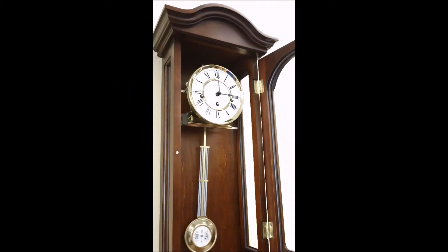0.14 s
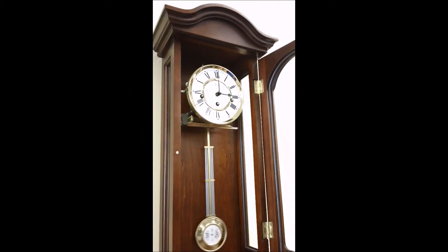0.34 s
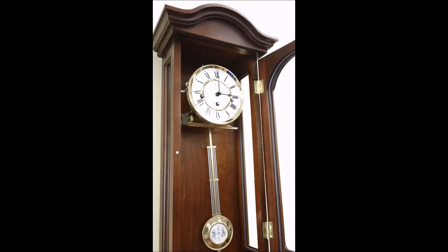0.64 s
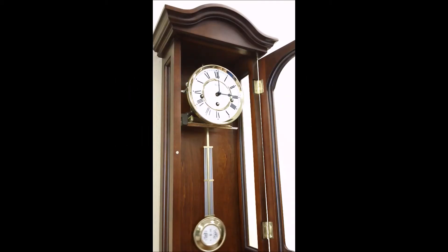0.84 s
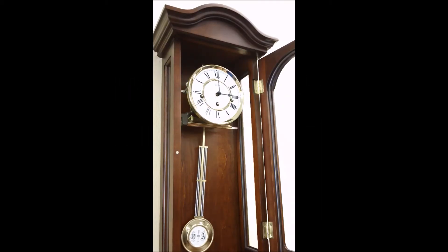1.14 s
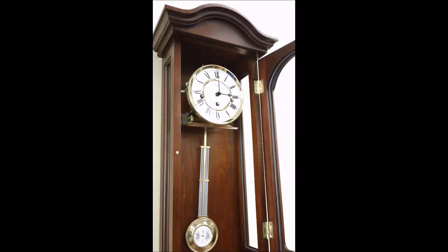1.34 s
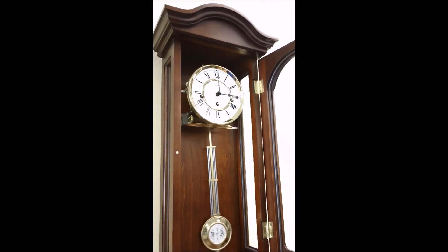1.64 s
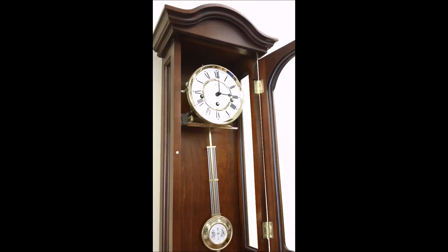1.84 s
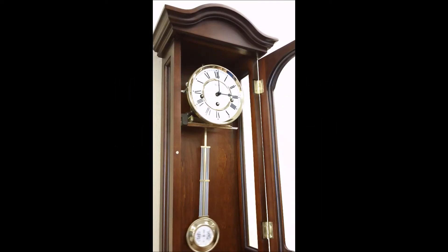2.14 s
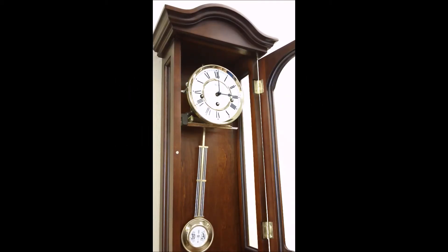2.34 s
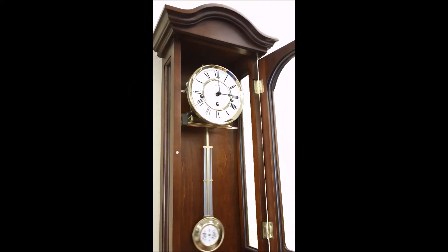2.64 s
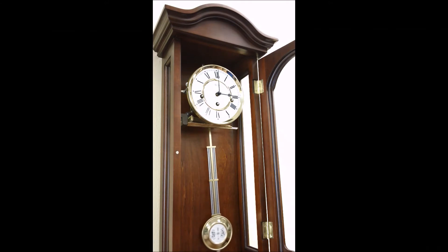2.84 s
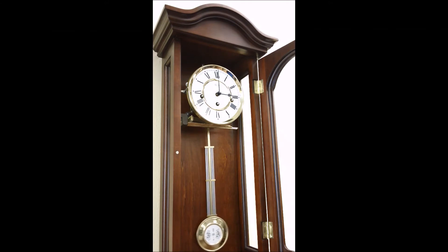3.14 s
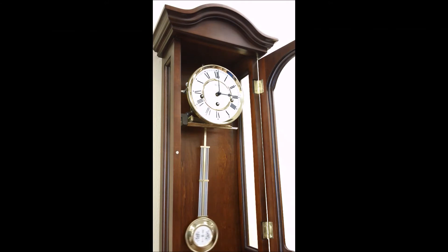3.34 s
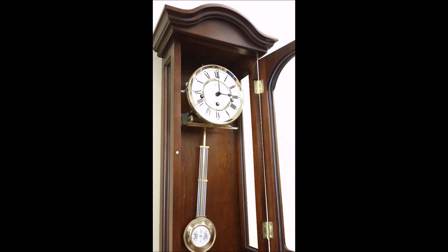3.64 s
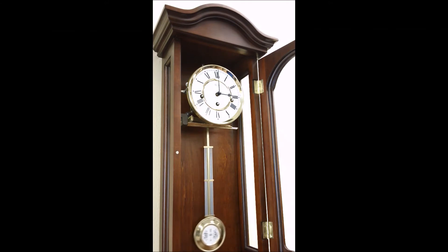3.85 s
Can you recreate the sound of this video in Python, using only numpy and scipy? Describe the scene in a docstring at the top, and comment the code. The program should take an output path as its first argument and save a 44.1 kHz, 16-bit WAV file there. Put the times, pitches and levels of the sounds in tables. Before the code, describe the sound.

Slow pendulum clock ticking, growing gradually louder, with one sharp metallic, woody clunk near the end

```python
"""Pendulum clock with a dropping lever

A wall clock ticks faintly in a quiet room: damped case partials and noise clicks, with tiny wheel clicks between.
Once a lever drops in the movement: ringing modes for plate, back board and lever, noise for rattle and panels.
Rumble, air, hum and hiss lie underneath, made of coloured noise and wavering sines, with one soft bump.
The whole sound grows slowly louder, and a decaying noise tail puts the clock in its room."""
import sys
import numpy as np
from scipy import signal
from scipy.fft import rfft, irfft, next_fast_len
from scipy.io import wavfile
from scipy.ndimage import map_coordinates

SR = 44100
rng = np.random.default_rng(int(sys.argv[2]) if len(sys.argv) > 2 else 0)


def wrap_up_sound(samples):
    """Save the sound to the file named by the first command line argument, as 16-bit audio."""
    columns = np.atleast_2d(samples).T
    # keep every value between -1 and 1, then stretch to whole-number steps
    tamed = np.clip(columns, -1, 1)
    steps = np.round(tamed * 32767).astype(np.int16)
    wavfile.write(sys.argv[1], SR, steps)


N = 176400  # samples, four seconds

# Partials of the wooden case. Each row: multiple of the case pitch, relative level in dB, T60 in seconds for a beat.
CASE_PARTIALS = [(0.999, 5, 0.041), (1.12, -6.5, .04), (1.62, -2.5, .04), (2.1, -9, 0.034),
                 (2.85, -5.5, 0.032)]
# Slow rise of the room noise. Each row: time in seconds, rumble level in dB, air level in dB, both before trim.
ROOM_NOISE_LEVELS = [(0.0, -62, -67.5), (0.43, -58.5, -65.5), (0.6, -59, -63), (0.87, -56, -62),
                     (1.53, -54.5, -60.5), (2.8, -50, -56.5), (3.04, -50.5, -56.5), (3.9, -49, -53),
                     (4.0, -49.5, -50)]


def amp(db):
    """Decibels to gain."""
    return 10 ** (np.asarray(db) / 20)


def unit(x):
    """Scale to rms 1."""
    return x / np.sqrt(np.mean(x ** 2) + 1e-20)


def along(points, hz):
    """Read (Hz, value) points on a log frequency axis."""
    point_hz, values = np.transpose(points)
    return np.interp(np.log(hz + 1), np.log(point_hz + 1), values)


def curves(rows):
    """One value per sample for each column after the time."""
    times, *columns = np.transpose(rows)
    return [np.interp(np.arange(N) / SR, times, column) for column in columns]


def wobble(rate):
    """A smooth random curve with rate knots a second."""
    knots = rng.standard_normal(int(N * rate / SR) + 4)
    return map_coordinates(knots, [np.arange(N) * rate / SR])


def filtered(x, response):
    """Multiply the spectrum of x by a response of frequency, with zero padding."""
    size = next_fast_len(N + SR // 2)
    spectrum = rfft(x, size) * response(np.fft.rfftfreq(size, 1 / SR))
    return irfft(spectrum, size)[..., :N]


def noise(spectrum):
    """Noise of rms 1 coloured by (Hz, dB) points."""
    return unit(filtered(rng.standard_normal(N), lambda hz: amp(along(spectrum, hz))))


def stereo(mid, side):
    """Left and right from middle and side."""
    return np.array([mid + side, mid - side])


def wide(spectrum, width):
    """Coloured noise in stereo; width is the level of the side over the middle."""
    return stereo(noise(spectrum), width * noise(spectrum))


def fade(rise, t60):
    """Half a second of exponential attack and decay, cut at its end."""
    t = np.arange(SR // 2) / SR
    decay = 1000 ** (-t / t60)  # 60 dB down after t60
    return (1 - np.exp(-t / rise)) * decay


def ring(modes, rise):
    """Struck resonances: a sum of damped sines from (Hz, dB, T60) rows."""
    t = np.arange(SR // 2) / SR
    return sum(amp(db) * fade(rise, t60) * np.sin(2 * np.pi * hz * t) for hz, db, t60 in modes)


def at(start_s, x):
    """Place a short sound in the scene."""
    return np.pad(x, (round(start_s * SR), N))[:N]


def rumble_and_air():
    """Low rumble, nearly mono, and wider air: two coloured noises that grow louder."""
    # Tone of the rumble. Each row: frequency in Hz, relative level in dB.
    rumble_colour = [(20, -17), (40, -15.5), (70, -6.5), (110, 4), (170, -4.5), (330, -2.5), (450, -14),
                     (700, -23.5), (1500, -64)]
    # Tone of the air. Each row: frequency in Hz, relative level in dB.
    air_colour = [(150, -35), (400, -0.5), (600, 1), (760, -0.5), (900, -1.5), (1200, -4), (2000, -6),
                  (2800, -8.5), (4000, -14), (8000, -61)]
    rumble_trim_db, air_trim_db = -0.5, 1
    rumble_db, air_db = curves(ROOM_NOISE_LEVELS)
    rumble = amp(rumble_db + rumble_trim_db) * wide(rumble_colour, 0.005)
    air = amp(air_db + air_trim_db) * wide(air_colour, 0.095)
    return rumble + air


def wavering_tone(hz, waver_rad):
    """A sine of rms 1 whose phase wanders smoothly."""
    t = np.arange(N) / SR
    return np.sqrt(2) * np.sin(2 * np.pi * hz * t + waver_rad * wobble(6.96))


def hum():
    """Two drones that come and go, and a hum with a faint high whine that rise with the rumble."""
    # Moving levels of the drones. Each row: time in seconds, low drone in dB, high drone in dB.
    drone_levels = [(0, -61, -68), (.6, -69.5, -68), (1.3, -60, -54.5), (1.65, -62.5, -56),
                    (1.95, -56, -58.5), (2.2, -59.5, -59.5), (2.78, -55, -65), (3.0, -63, -56),
                    (4, -65, -70.5)]
    # Hum and faint high whine. Each row: frequency in Hz, level in dB against the untrimmed rumble level.
    hum_lines = [(120, -11), (240, -13), (360.2, -11), (720.5, -22), (2700, -23), (2940, -32)]
    low_db, high_db = curves(drone_levels)
    rumble_db, _ = curves(ROOM_NOISE_LEVELS)
    drones = amp(low_db) * wavering_tone(54.6, 0.6) + amp(high_db) * wavering_tone(134.6, 0.77)
    hum_and_whine = sum(amp(rumble_db + db) * wavering_tone(hz, 0.15) for hz, db in hum_lines)
    return drones + hum_and_whine


def hiss():
    """Fine wide noise that grows louder, with a few brief, rough-edged swells in the middle."""
    # Level of the hiss. Each row: time in seconds, level in dB before trim.
    hiss_levels = [(0, -69.5), (.35, -69), (.45, -68.5), (1.2, -63.5), (2, -61.5), (3, -59), (3.7, -57.5),
                   (4, -54.5)]
    # Tone of the hiss. Each row: frequency in Hz, relative level in dB.
    hiss_colour = [(1000, 0), (2200, -7.5), (3000, -1), (4500, 1), (6500, -1.5), (9000, -4), (11000, -8),
                   (12500, -22.5), (14500, -6), (15500, -11)]
    # Brief soft swells. Each row: start in seconds, length in seconds, level in dB before roughness.
    swell_times = [(0.358, 0.15, -67.5), (0.477, .12, -63), (0.688, 0.18, -62), (0.857, 0.13, -67.5),
                   (1.065, .1, -60.5)]
    # Tone of the swells. Each row: frequency in Hz, relative level in dB.
    swell_colour = [(500, -10), (1500, 5.5), (2800, 3), (6000, -0.5), (9000, -3), (12000, -15),
                    (15000, -18)]
    trim_db, edge_s, rough_db, rough_rate = 0.5, 0.026, 2, 37  # rate in knots a second
    t = np.arange(N) / SR
    level_db, = curves(hiss_levels)
    steady = amp(level_db + trim_db) * wide(hiss_colour, 0.37)
    swells = 0
    for start_s, length_s, db in swell_times:
        to_edge_s = np.minimum(t - start_s, start_s + length_s - t)
        swells = swells + amp(db) * np.clip(to_edge_s / edge_s, 0, 1)
    roughness = amp(rough_db * wobble(rough_rate))
    return steady + swells * roughness * noise(swell_colour)


def bump():
    """A soft bump in the room: a low damped thump under a burst of dull noise."""
    # The rustle, one row: start in seconds, level in dB, T60 in seconds.
    rustle_row = (0.073, -55.5, 0.72)
    # Tone of the rustle. Each row: frequency in Hz, relative level in dB.
    rustle_colour = [(80, -16), (230, -5), (350, -10), (530, -2), (900, -19), (3000, -32), (9000, -70)]
    # The thump. Each row: frequency in Hz, level in dB, T60 in seconds.
    thump_modes = [(235, -46.5, .13)]
    rise_s = 0.003
    start_s, db, t60 = rustle_row
    thump = at(start_s, ring(thump_modes, rise_s))
    rustle = at(start_s, amp(db) * fade(rise_s, t60)) * noise(rustle_colour)
    return thump + rustle


def room(x):
    """The room's tail: decaying noise, nearly mono, with its own T60 in each frequency region."""
    # Decay of the room. Each row: frequency in Hz, T60 in seconds.
    room_decay = [(200, 0.31), (1000, 0.56), (3000, 0.25), (8000, 0.27), (15000, 0.18)]
    level_db, width = -19, 0.02
    hz, t, bins = signal.stft(rng.standard_normal((2, SR // 2)), SR, nperseg=256)
    decay = 1000 ** (-t / along(room_decay, hz)[:, None])
    tail = signal.istft(bins * decay, SR, nperseg=256)[1]
    tail = tail / np.linalg.norm(tail[0])
    mid, side = signal.fftconvolve(x[None], tail, axes=1)[:, :N]
    return amp(level_db) * stereo(mid, width * side)


def wheels():
    """Tiny slips in the wheel train ring the case more briefly, each partial slightly off pitch."""
    # Wheel clicks. Each row: start in seconds, gain in dB on the case partials.
    wheel_clicks = [(.445, -54), (0.497, -50.5), (.554, -52.5), (.608, -52.5), (.665, -52), (1.155, -53),
                    (1.206, -50.5), (1.265, -53), (1.427, -51.5), (1.48, -51), (1.534, -48.5), (1.646, -49),
                    (1.707, -49.5), (1.76, -48.5), (1.815, -48), (2.378, -47), (2.435, -46), (3.058, -44),
                    (3.793, -45), (3.963, -45)]
    pitch_hz, pitch_spread, t60_factor, rise_s = 918, 0.058, 0.47, 0.00054
    spread = rng.standard_normal((len(wheel_clicks), len(CASE_PARTIALS)))
    pitches = pitch_hz * (1 + pitch_spread * spread)
    clicks = 0
    for (start_s, gain_db), row in zip(wheel_clicks, pitches):
        modes = [(hz * multiple, db, t60 * t60_factor)
                 for hz, (multiple, db, t60) in zip(row, CASE_PARTIALS)]
        clicks = clicks + at(start_s, amp(gain_db) * ring(modes, rise_s))
    return clicks


def escapement():
    """A tooth clicks on the pallet and the case answers with a short knock."""
    # Beats. Each row: start in seconds, knock gain in dB on the partials, click level in dB, case pitch in Hz.
    beats = [(0.397, -50, -57, 914), (0.9850, -46, -48.5, 963), (1.5785, -43.5, -50, 913),
             (2.161, -41.5, -44, 930), (2.7572, -38.5, -46, 926), (3.337, -38.5, -41.5, 923),
             (3.930, -37, -42.5, 914)]
    # Tone of the tooth click. Each row: frequency in Hz, relative level in dB.
    click_colour = [(500, -14), (1500, 6), (2700, 8.5), (4000, -5), (5200, -2), (6500, -1), (9000, 1),
                    (11000, -5), (12600, -18), (15000, -3.5)]
    knock_lag_s, knock_rise_s, click_rise_s, click_t60 = 0.00315, 0.0017, 0.0009, 0.04
    knocks, click_envelope = 0, 0
    for start_s, knock_db, click_db, pitch_hz in beats:
        modes = [(pitch_hz * multiple, db, t60) for multiple, db, t60 in CASE_PARTIALS]
        knocks = knocks + at(start_s + knock_lag_s, amp(knock_db) * ring(modes, knock_rise_s))
        click_envelope = click_envelope + at(start_s, amp(click_db) * fade(click_rise_s, click_t60))
    return knocks + click_envelope * noise(click_colour)


def plate_and_lever():
    """The lever hits the movement's plate and chokes its ring, while the lever itself rings thinly."""
    # Modes of the plate. Each row: frequency in Hz, relative level in dB, T60 in seconds before the choke.
    plate_modes = [(495, -15, .14), (1028, 9.5, 0.019), (1180, -10, 0.037), (1470, -7, 0.098),
                   (1513, -4, 0.095), (1878, -11.5, 0.094), (2370, -10.5, 0.1), (2644, -9.5, 0.068),
                   (2620, -10, 0.05), (2705, 4.5, 0.061), (3040, -9, 0.03)]
    # Ringing of the lever. Each row: frequency in Hz, level in dB, T60 in seconds.
    lever_modes = [(4350, -40, .12), (5785, -35, 0.058), (6178, -38, 0.091), (8100, -40.5, 0.074),
                   (8042, -39.5, .12), (9300, -46, .13), (10300, -53, 0.064), (13920, -34, .055),
                   (14488, -47, 0.39)]
    plate_db, rise_s, hold_s, choke_db = -18.5, 0.0019, 0.0053, -6.5
    t = np.arange(SR // 2) / SR
    choke = amp(choke_db * np.clip((t - hold_s) / rise_s, 0, 1))  # steps down after the hold
    plate = amp(plate_db) * choke * ring(plate_modes, rise_s)
    return plate + ring(lever_modes, 0.0008)


def back_board():
    """The lever knocks the back board of the case, which rings in damped wooden modes."""
    # Knocks on the board. Each row: start in seconds, gain in dB on the modes.
    knock_times = [(3.3975, -15), (3.4259, -33)]
    # Modes of the board. Each row: frequency in Hz, relative level in dB, T60 in seconds.
    board_modes = [(426, -29, 0.14), (519, -22, 0.074), (890, -26, 0.2), (983, 2, 0.071), (1074, -20, 0.18),
                   (1225, -29, 0.34), (1660, -26.5, 0.13)]
    return sum(at(start_s, amp(db) * ring(board_modes, 0.0028)) for start_s, db in knock_times)


def rattle():
    """The lever rattles to rest: short bursts of bright noise, the lighter contacts mostly thinner."""
    # Contacts of the lever. Each row: start in seconds, level in dB, low cut in Hz.
    contacts = [(3.3877, -25.5, 2000), (3.395, -22.5, 4500), (3.402, -28, 2500), (3.414, -32, 6500),
                (3.423, -41, 6500), (3.431, -40.5, 6500)]
    # Tone of the steel. Each row: frequency in Hz, relative level in dB before the low cut.
    steel_colour = [(1700, -24), (3000, -3.5), (3790, -7.5), (4320, 0), (5300, -8), (5960, -3.5),
                    (6600, -6.5), (7900, -3.5), (8500, -6), (9400, -5), (11000, -8.5), (11900, -9),
                    (12600, -37), (14000, -14), (15500, -19)]
    rise_s, t60 = 0.0008, 0.026
    bursts = 0
    for start_s, db, low_hz in contacts:
        steel = filtered(noise(steel_colour), lambda hz: hz ** 3 / np.hypot(hz ** 3, low_hz ** 3))
        bursts = bursts + at(start_s, amp(db) * fade(rise_s, t60)) * unit(steel)
    return bursts


def panels(start_s):
    """The case panels hum on: their dense, short-lived ringing is a decaying coloured noise."""
    # Tone of the panels. Each row: frequency in Hz, relative level in dB.
    panel_colour = [(200, -30), (400, -2), (700, -10), (880, 2), (1000, 1), (1170, -5), (1350, -7),
                    (1600, 1.5), (2100, -13), (2450, -10), (2720, -2.5), (3100, -14.5), (6000, -45)]
    return at(start_s, amp(-33.5) * fade(0.003, 0.23)) * noise(panel_colour)


def lever_drop():
    """One drop heard as plate, lever ring, board knocks, rattle and panels together."""
    drop_s = 3.3865
    return at(drop_s, plate_and_lever()) + back_board() + rattle() + panels(drop_s)


def scene():
    """The clock straight ahead in its room, over the background."""
    background = rumble_and_air() + hum() + hiss() + bump()
    clock = wheels() + escapement() + lever_drop()
    return background + room(clock) + clock


def record(dry):
    """A steep band limit: nothing is kept from 15.6 kHz upwards."""
    return filtered(dry, lambda hz: hz < 15600)


dry = scene()
out = record(dry)
wrap_up_sound(out)
```